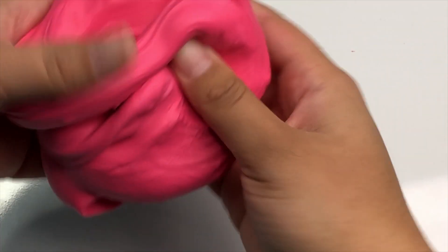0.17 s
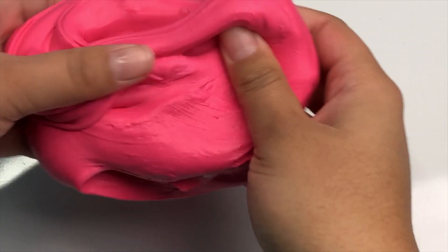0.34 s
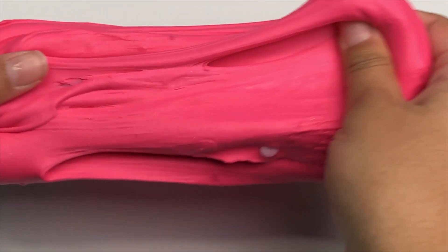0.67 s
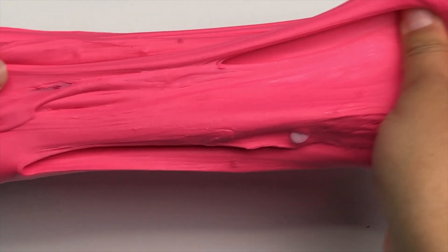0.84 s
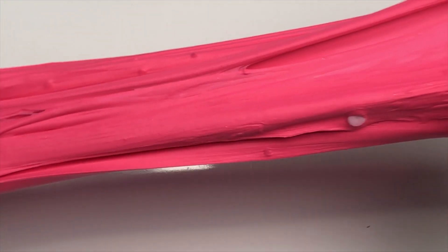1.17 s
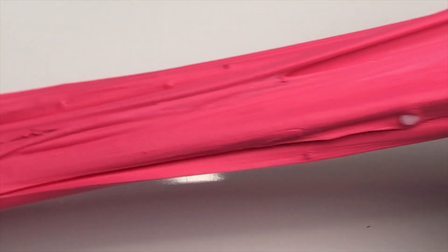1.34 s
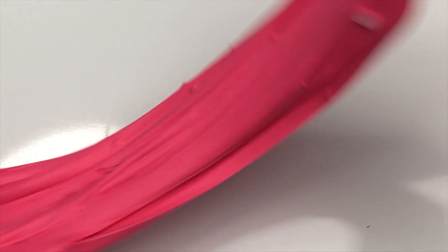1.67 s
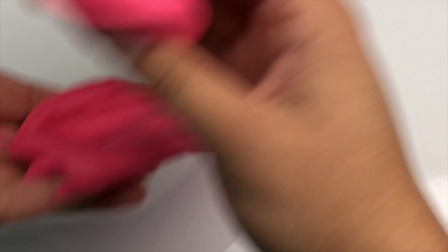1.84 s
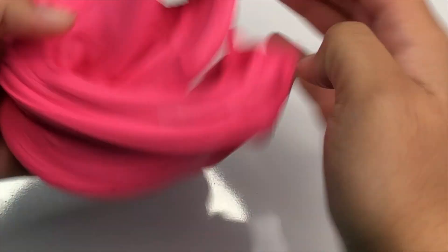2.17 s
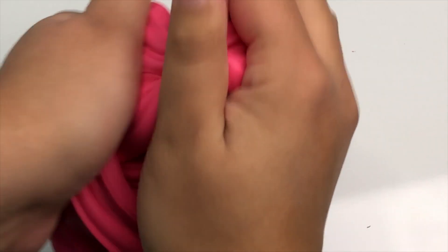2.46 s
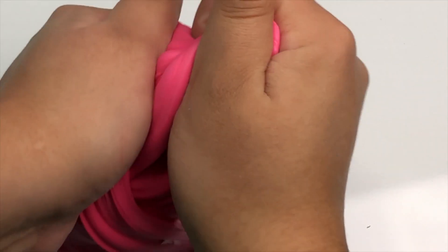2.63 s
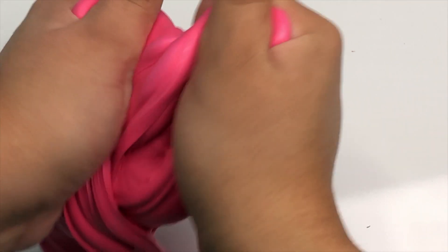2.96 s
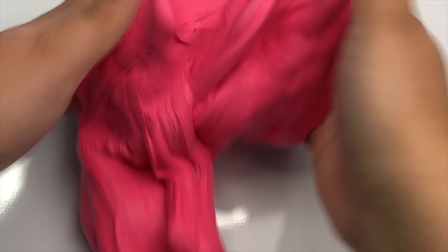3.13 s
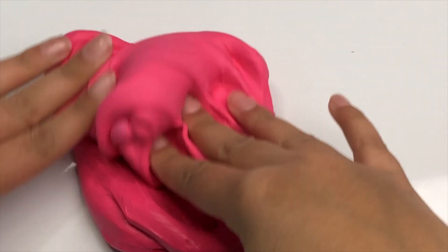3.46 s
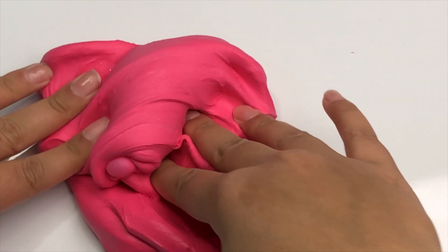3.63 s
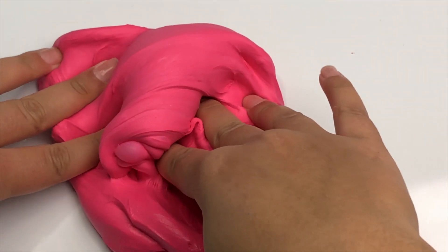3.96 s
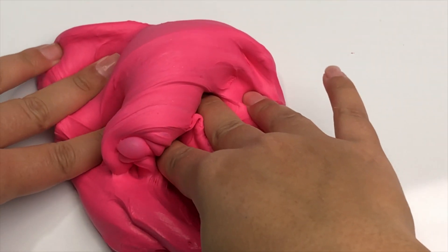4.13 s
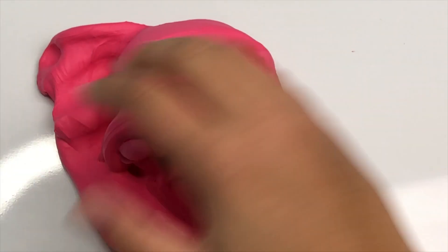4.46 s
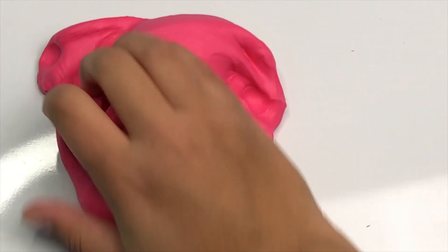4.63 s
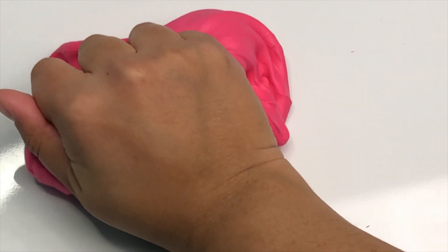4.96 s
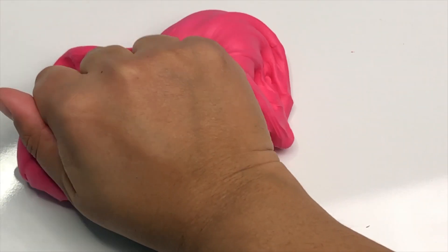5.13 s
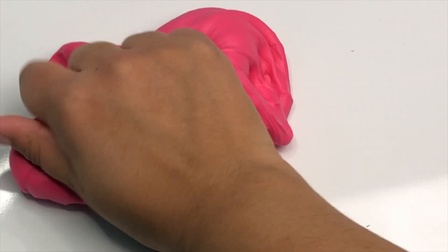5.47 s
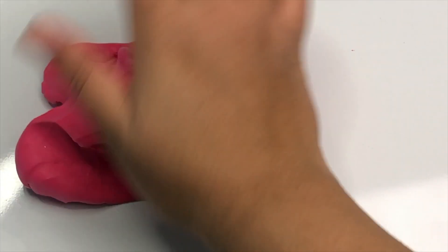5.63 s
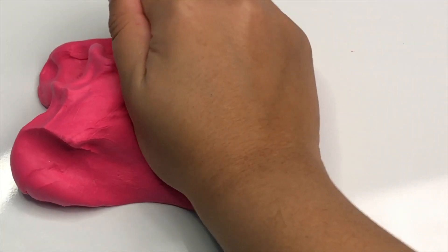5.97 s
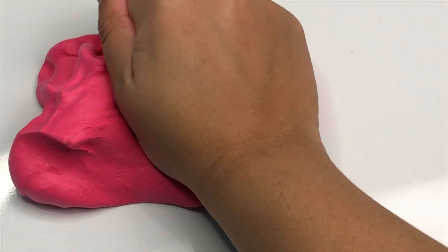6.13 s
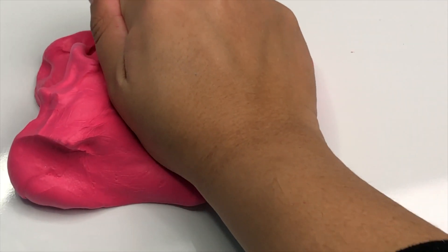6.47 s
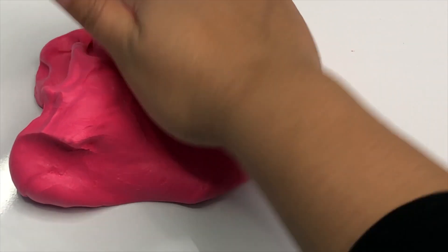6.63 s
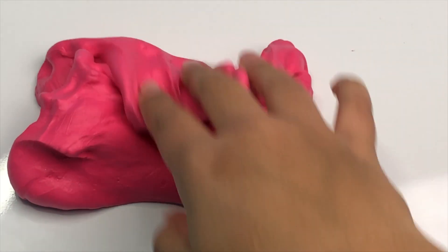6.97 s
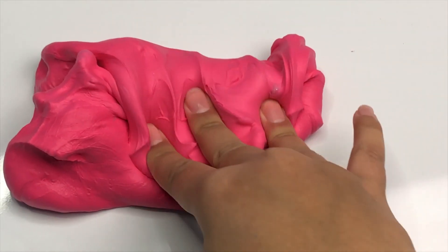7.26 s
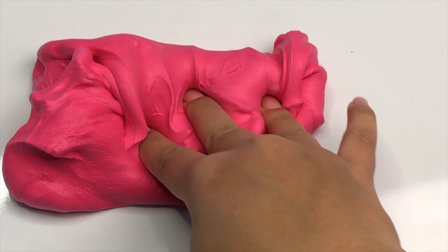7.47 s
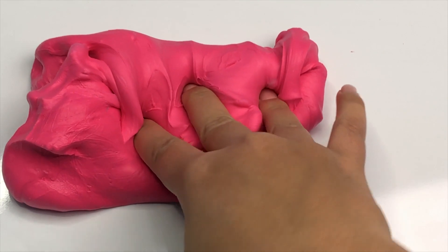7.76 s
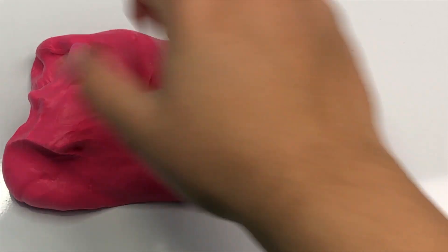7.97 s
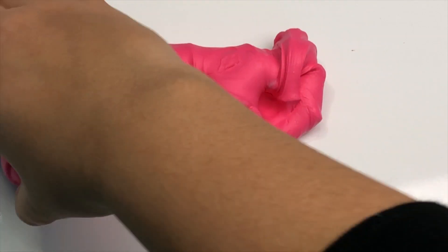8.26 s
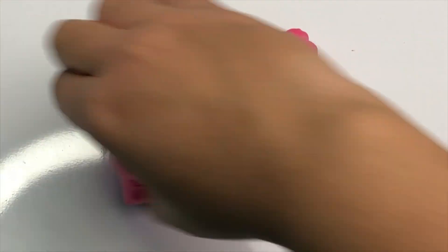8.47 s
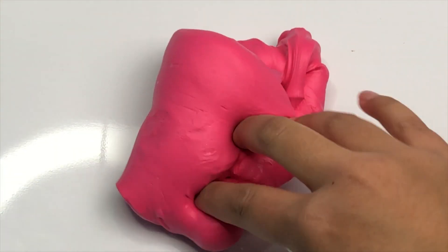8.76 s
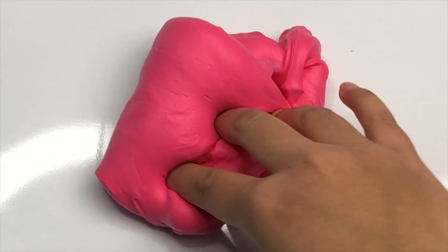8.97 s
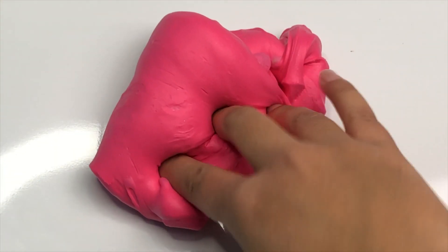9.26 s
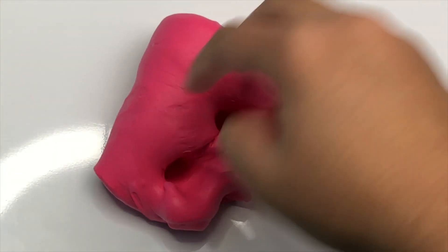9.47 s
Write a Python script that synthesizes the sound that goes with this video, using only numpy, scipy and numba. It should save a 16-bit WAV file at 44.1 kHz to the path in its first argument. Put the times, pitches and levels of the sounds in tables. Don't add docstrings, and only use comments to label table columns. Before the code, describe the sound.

Very close to the microphone, hands stretch and fold thick slime, with faint sticky crackle and tiny ticks. It is dropped on a hard table with denser tearing and soft rumble, then pressed, and trapped air bursts in loud sharp pops, the strongest slightly distorted. Quieter squelchy pokes and peeling follow, then one last snap and thud. Small room, faint ventilation hum.

```python
import sys
import numpy as np
from scipy import signal
from scipy.fft import rfft, irfft
from scipy.io import wavfile
from scipy.ndimage import uniform_filter1d
from numba import njit

SR = 44100
rng = np.random.default_rng(int(sys.argv[2]) if len(sys.argv) > 2 else 0)


def pcm_store(signal):
    levels = np.round(np.clip(np.atleast_2d(signal), -1, 1) * 32767)
    wavfile.write(sys.argv[1], SR, levels.astype(np.int16).T)


def makeup_ratio(level_db):
    decades = np.asarray(level_db, float) / 20
    return 10 ** decades


N = 423360


def level(x, db):
    return x * makeup_ratio(db) / np.sqrt(np.mean(x ** 2))


def band(x, low_hz, high_hz):
    sos = signal.butter(2, [low_hz, high_hz], "bandpass", fs=SR, output="sos")
    return signal.sosfilt(sos, x)


@njit
def svf(x, hz, width_hz):
    y, band_state, low_state = np.empty(len(x)), 0., 0.
    g, k = np.tan(np.pi * hz / SR), width_hz / hz
    for i in range(len(x)):
        v = (band_state + g * (x[i] - low_state)) / (1 + g * (g + k))
        band_state = 2 * v - band_state
        low_state += 2 * g * v
        y[i] = k * v
    return y


@njit
def grains(n, at, hz, cycles, size, glide, soft):
    out = np.zeros(n)
    for k in range(len(at)):
        f, phase, age = hz[k], 0., 0.
        for i in range(at[k], min(n, at[k] + int(12 * cycles[k] * SR / f) + 2)):
            rise = np.exp(-3 * age)
            out[i] += size[k] * np.exp(-age) * (1 - rise) * (1 - soft * rise) * np.sin(phase)
            phase += 2 * np.pi * f / SR
            age += f / SR / cycles[k]
            f *= 1 + glide * f / SR
    return 2 * out


def walk(rate_hz):
    hold = int(SR / rate_hz)
    steps = np.repeat(rng.standard_normal(N // hold + 1), hold)
    return 1.3 * uniform_filter1d(uniform_filter1d(steps, hold), hold)[:N]


def swells(rows, extra_db):
    t, power = np.arange(0, N, 50) / SR, 0
    for (s, db, swell_s, fade_s), more_db in zip(rows, extra_db):
        away = np.maximum((s - t) / max(swell_s, .004), (t - s) / max(fade_s, .004))
        power = power + makeup_ratio(db + more_db - 20 * away) ** 2
    return np.interp(np.arange(N) / SR, t, np.sqrt(power))


def air():
    # f/Hz, level/dB per Hz
    air_spectrum = [(15, -48.5), (25, -24), (117, -1), (195, -9), (285, -9.5), (335, -15), (373, -15),
                    (560, -22), (754, -24), (1260, -28.5), (2220, -31.5), (14800, -38.5), (16000, -44.5)]
    # f/Hz, width/Hz, level/dB
    duct_modes = [(59.6, 11, -65), (116.9, 11, -58), (287.6, 9.1, -64.5), (368.2, 7.7, -73)]
    hz, db = np.transpose(air_spectrum)
    f = np.maximum(np.arange(N // 2 + 1) * SR / N, 1)
    shape = makeup_ratio(np.interp(np.log(f), np.log(hz), db))
    bed = irfft(rfft(rng.standard_normal(N)) * shape, N)
    out = level(bed, -57) * makeup_ratio(0.38 * walk(4.1))
    for hz, width_hz, db in duct_modes:
        mode = svf(svf(rng.standard_normal(N), 1. * hz, 1. * width_hz), 1. * hz, 2. * width_hz)
        out = out + level(mode, db) * makeup_ratio(1.8 * walk(0.82))
    return out


def room():
    # upper band edge f/Hz, t60/s, level/dB
    decay_bands = [(1040, 0.24, -13.5), (4860, .24, -14.5), (9673, .22, -16.5), (19700, 0.2, -15)]
    scatter_t60_s, scatter_db = 0.033, -8.5
    t, low_hz = np.arange(SR // 2) / SR, 120
    out = level(rng.standard_normal(len(t)) * makeup_ratio(-60 * t / scatter_t60_s), scatter_db)
    for hz, t60_s, db in decay_bands:
        tail = band(rng.standard_normal(len(t)), low_hz, hz) * makeup_ratio(-60 * t / t60_s)
        tail = tail * np.clip(t / 0.0035, 0, 1)
        width_db = 10 * np.log10((hz - low_hz) * 2 / SR)
        out = out + level(tail, db + width_db + 3.5)
        low_hz = hz
    return out / np.sqrt(len(t))


def echoes(bursts):
    # delay t/s, level/dB
    bounces = [
        (.0016, -2),
        (.0065, -22),
        (0.0157, -14.5),
    ]
    out = np.zeros(N)
    for (s, db), top_hz in zip(bounces, [18000, 18000, 6000]):
        lag = int(s * SR)
        out[lag:] += makeup_ratio(db) * band(bursts, 900, top_hz)[:-lag]
    return out


def table_rumble():
    # f/Hz, width/Hz, level/dB
    table_modes = [(70, 27, -4.5), (125, 47, 23), (191, 120, -0.5), (288.8, 31, -5)]
    # t/s, level/dB, swell/s, fade/s
    push_rows = [(.03, -58, .1, .15), (.3, -53.5, .1, 0.076), (.42, -51, .08, 0.15), (.62, -61, .15, 0.36),
                 (.87, -58.5, .1, 0.18), (1.69, -61, .04, .2), (1.88, -54, .06, 0.061),
                 (2.254, -63, .08, 0.049), (3.12, -50, .05, 0.17), (3.3, -47, .15, 0.22),
                 (3.99, -48, .02, .06), (4.42, -40, .08, .07), (4.7, -39.5, .02, 0.062),
                 (5.03, -46, .02, 0.18), (5.25, -43, .01, 0.065), (5.63, -30, .08, 0.091),
                 (5.882, -31, .03, 0.09), (6.105, -40, .01, 0.11), (6.335, -42, .01, 0.096),
                 (6.7, -36.5, .04, 0.094), (6.79, -40, .03, 0.12), (8.0, -39.5, .07, 0.1),
                 (8.27, -43, .05, 0.14), (9.445, -25.5, .02, 0.1)]
    push_gain = swells(push_rows, [0] * len(push_rows))
    push = rng.standard_normal(N) * makeup_ratio(1.9 * walk(43))
    modes = sum(makeup_ratio(db) * svf(push, 1. * hz, 1. * width_hz) for hz, width_hz, db in table_modes)
    return push_gain * band(level(modes, -3), 68, 760)


def thumps():
    # t/s, peak level/dB, pitch f/Hz at ref_s, fade/s
    blows = [(5.8543, -15, 500, .008), (5.872, -27, 450, .01), (3.9725, -31, 520, .008),
             (8.2205, -35, 300, .012), (8.244, -31, 420, .012), (9.4325, -10, 1150, .0045),
             (9.469, -23, 450, .01), (4.693, -39, 300, .015), (4.416, -35, 380, .01),
             (8.481, -42, 500, .006), (1.684, -35, 700, .004), (5.025, -30, 700, .005),
             (6.102, -12, 950, .004), (6.265, -18, 750, .004), (6.331, -14, 620, .005),
             (5.34, -27, 600, .005), (5.632, -30, 350, .012), (7.992, -40, 400, .01)]
    ref_s, fall, rise_s = .004, .72, .0014
    out, t = np.zeros(N), np.arange(1, SR // 8) / SR
    for s, peak_db, hz, fade_s in blows:
        turns = hz * ref_s * (t / ref_s) ** (1 - fall) / (1 - fall)
        envelope = (1 - np.exp(-t / rise_s)) ** 2 * np.exp(-t / fade_s)
        wave = makeup_ratio(peak_db - 1.5) * envelope * np.sin(2 * np.pi * turns)
        start = int(s * SR)
        out[start:][:len(t)] += wave[:N - start]
    return out


def crackle(count, centre_hz, octaves, cycles, spread_db):
    when, up, down, size = rng.random((count, 4)).T
    at = (when * N).astype(np.int64)
    hz = np.clip(centre_hz * 2 ** (octaves * (up - down)), 300, 17000)
    sign = np.where(np.arange(count) % 2, 1, -1)
    size = makeup_ratio(spread_db * np.minimum(-np.log(1 - size), 5.5)) * sign
    return level(grains(N, at, hz, np.full(count, cycles), size, 0., 0.), 0)


def peeling():
    # t/s of most pull, level/dB, swell/s, fade/s (per 20 dB),
    # treble/dB
    effort_rows = [(0.09, -56.5, .12, 0.083, 0.5), (0.301, -56, .02, 0.21, -4.5), (.36, -60.5, .1, 0.16, 1),
                   (.45, -59.5, .1, 0.032, -14.5), (1.687, -45, .03, 0.06, -3), (1.765, -57, .04, .05, 0),
                   (1.812, -58, .008, .015, 2), (2.09, -66, 0.063, 0.11, -3), (2.251, -51, .08, .06, 0),
                   (2.35, -57.5, .06, 0.076, -0.5), (2.42, -58, .05, 0.068, -8), (2.58, -59.5, .15, 0.21, 0),
                   (2.68, -56, .1, 0.087, -0.5), (2.79, -64, .08, 0.15, -1.5), (2.9, -49.5, .05, .08, 6),
                   (3.06, -56.5, .04, 0.055, -10), (3.104, -46, .05, .012, 4), (3.14, -47, .012, .06, 2),
                   (3.165, -41, .05, .15, 2), (3.23, -45, .15, .15, -2.5), (3.3, -45, .1, .045, -1.5),
                   (3.37, -57, .05, .15, -20), (3.46, -61, .08, 0.25, 0.5), (3.596, -52.5, .02, 0.0397, -7),
                   (4.377, -47, .03, .1, 4), (4.422, -47, .1, 0.048, -2), (4.63, -52.5, .1, 0.18, -13),
                   (4.75, -48, 0.13, 0.097, -1), (4.9, -60, .2, 0.23, -4.5), (5.088, -51.5, .15, 0.046, -7),
                  (5.3, -55, 0.13, 0.32, -6), (5.5, -59.5, 0.27, 0.063, -7.5),
                  (5.605, -38, 0.047, 0.075, -8), (5.655, -36.5, 0.1, 0.048, -9),
                  (5.95, -62, 0.25, .15, -5.5), (6.099, -51, 0.066, .3, -12.5),
                  (6.3, -49.5, 0.19, 0.42, -8.5), (6.693, -37, 0.03, 0.08, -1), (6.787, -39, .03, .06, -8),
                  (6.865, -46, .07, .06, -8.5), (7.02, -63, .08, 0.22, 0.5), (7.13, -66, .15, 0.19, 1.5),
                  (7.94, -55.5, .03, 0.067, 1), (7.995, -51, 0.047, 0.036, 1),
                  (8.04, -64, 0.029, 0.031, -7), (8.27, -53.5, .06, .15, -8.5), (8.34, -57, .1, 0.26, 2.5),
                  (8.47, -61, 0.272, 0.24, 1), (8.62, -60, 0.309, 0.11, 1), (8.78, -69, 0.075, 0.082, 5.5),
                  (9.433, -42, 0.018, .03, 1.5)]
    efforts = np.array(effort_rows)
    body_gain = swells(efforts[:, :4], 0 * efforts[:, 4])
    treble_gain = swells(efforts[:, :4], efforts[:, 4])
    ragged = makeup_ratio(1.9 * walk(110) + .7 * walk(40))
    body = crackle(count=12000, centre_hz=1870, octaves=.8, cycles=2.2, spread_db=3.0)
    wide = crackle(count=30000, centre_hz=3900, octaves=2.2, cycles=1.1, spread_db=2.8)
    treble = crackle(count=70000, centre_hz=11300, octaves=1.3, cycles=1.3, spread_db=2.6)
    tearing = body_gain * (makeup_ratio(-18.5) * body + wide) + makeup_ratio(-0.5) * treble_gain * treble
    return ragged * band(tearing, 450, 20000)


def squeaks():
    # t/s, peak level/dB, f/Hz, length/cycles
    whistles = [(5.24, -42, 3000, 12), (6.0865, -38, 3000, 10), (6.0935, -35, 2950, 8),
                (6.0975, -27, 3035, 14), (6.107, -14, 2900, 6), (6.113, -19, 3300, 6),
                (6.118, -11, 3200, 2.5), (6.806, -41, 1170, 9), (1.69, -33.5, 990, 10.5),
                (2.205, -49, 2640, 30), (2.24, -44.5, 2640, 37), (2.241, -53, 1216, 16),
                (3.053, -47, 1670, 10), (6.86, -38, 1135, 7.9), (6.881, -40, 1240, 4)]
    s, peak_db, hz, cycles = np.transpose(whistles)
    return grains(N, (s * SR).astype(np.int64), hz, cycles, makeup_ratio(peak_db), .0006, 0.)


def pockets():
    # t/s, peak level/dB, cavity f/Hz, thud/dB, snap/dB
    big_rows = [(2.838, -26.5, 3300, -35.5, -9), (2.8664, -25, 1800, -35, -5), (2.88, -12, 6060, -46, -10),
                (2.972, -21, 4118, -53, -9.5), (4.982, -26.5, 4020, -26, -12.5),
                (5.0258, -9, 2850, -25, -35), (5.074, -26, 8000, -22, -6), (5.123, -23.5, 4056, -28.5, -14),
                (5.172, -16, 4363, -17, -8), (5.2477, -3, 3280, -46.5, 2), (5.289, 4, 8390, -45.5, -12),
                (5.3412, -3, 2900, -35.5, -26), (5.3985, -16, 11500, -40, -10), (5.4344, 2, 6873, -53, -10),
                (6.103, 3, 2650, -29, -22), (6.1427, -15, 5000, -31, -6.5), (6.19, -13, 2665, -27, -16),
                (6.2665, 0.5, 3002, -31, -13), (6.3025, -12, 2500, -19, -25.5),
                (6.3295, -6, 2005, -22, -5.5), (6.3325, 2, 2500, -37.5, -1),
                (9.4334, -12, 2820, -25, -10.5), (9.435, -15, 1900, -28, 0), (9.4518, -13, 3000, -35, -4)]
    # t/s, peak level/dB, cavity f/Hz, thud/dB
    slap_rows = [(1.686, -22, 1140, -40), (1.697, -24, 990, -40), (3.221, -38, 778, -17),
                 (3.973, -39, 2400, -20), (3.9735, -35, 1200, -20), (4.679, -35, 1300, -19),
                 (5.599, -17.5, 2300, -19), (5.634, -25.5, 1700, -10), (5.8548, -23, 1900, -20),
                 (5.873, -33, 2300, -20), (6.717, -30.5, 1864, -13), (6.819, -40, 790, -3),
                 (6.883, -34.5, 1160, -19.5), (6.1045, -11.5, 1200, -29), (7.938, -29, 1200, -24),
                 (7.977, -41, 950, -6), (7.994, -37.5, 788, 4.5), (8.245, -44, 1500, -20),
                 (8.482, -45.5, 771, 4.5), (9.472, -30, 1500, -20)]
    # t/s, peak level/dB, cavity f/Hz
    tick_rows = [(0.302, -37.5, 2370), (0.381, -43.5, 1840), (0.656, -42.5, 1580), (0.8754, -47.5, 3630),
                 (.9662, -43, 10100), (1.0987, -51, 2900), (1.809, -43, 5030), (.44, -43.5, 2500),
                 (2.04, -47, 11000), (2.16, -46, 10000), (2.05, -47.5, 1540), (2.082, -41, 2570),
                 (2.36, -44.5, 1580), (2.533, -46, 1720), (2.64, -37, 1660), (2.678, -32.5, 3830),
                 (2.7252, -38, 10900), (2.765, -48, 2840), (3.02, -35, 4350), (3.056, -38.5, 1700),
                 (3.092, -30, 9150), (3.104, -31.5, 7410), (3.165, -30, 1680), (3.2832, -28.5, 11100),
                 (3.324, -28, 1680), (3.487, -47, 1880), (3.528, -45, 1620), (3.592, -47, 1190),
                 (4.864, -36.5, 2670), (4.957, -37, 1520), (5.0915, -33, 1980), (5.0918, -33, 9000),
                   (6.234, -29, 11000), (6.487, -39, 2830), (6.516, -33.5, 12020), (6.536, -42.5, 2030),
                   (6.5813, -42.5, 10300), (6.5944, -44, 3000), (6.6294, -57, 3680), (7.153, -41.5, 6610),
                   (8.042, -39, 5930), (8.361, -29.5, 11000), (5.015, -31.5, 3300), (9.472, -18, 9100),
                   (9.15, -50, 5010), (7.9377, -28, 5500), (7.998, -34, 7060), (6.648, -45.5, 5000),
                   (8.5478, -34.5, 5500), (8.888, -43, 4410), (9.0234, -44.5, 5500), (9.202, -48.5, 8970),
                 (3.1356, -34, 7800), (3.1561, -32, 4200), (8.2602, -43, 2830), (8.2896, -43, 1740),
                   (8.3245, -40, 7050), (8.3615, -40, 3200), (8.4817, -41, 3830), (8.41, -46, 1150),
                   (8.515, -47, 2150), (4.3497, -42, 3520), (4.3662, -36, 7520), (4.3777, -35, 7460),
                   (4.41, -36, 7000), (4.438, -37, 1600), (4.5313, -50, 5280), (4.7264, -37, 6000),
                   (4.7268, -41, 1400), (4.8062, -42, 5300), (1.716, -40, 6000), (1.763, -42, 4500),
                   (1.771, -42, 5800), (1.815, -43, 6000), (3.935, -48, 4300), (3.9352, -50, 1300),
                   (5.2535, -16, 9000), (6.3385, -10, 8200), (6.334, -3, 8300), (6.3335, -8, 15000),
                   (5.059, -42, 11000), (5.187, -34, 4500), (6.084, -42, 8000), (5.8552, -31, 5500),
                   (5.172, -25, 13500)]
    rows = [(*row, 0.8) for row in big_rows]
    rows += [(*row, -17.5, 0.96) for row in slap_rows]
    rows += [(*row, -21.5, -10, 1.2) for row in tick_rows]
    return np.transpose(rows)


def pops():
    s, peak_db, hz, thud_db, snap_db, ring = pockets()
    at, ring = (s * SR).astype(np.int64), np.clip(ring, .4, 8)
    chance = rng.random((200, 10))[:len(s)].T
    sign = np.where(chance[0] < .5, -1., 1.)
    out = grains(N, at, hz, ring, sign * makeup_ratio(peak_db + .7), 0., .8)
    out += grains(N, at + 10, .48 * hz, 0 * s + .6, -sign * makeup_ratio(peak_db - 14), 0., 0.)
    out += grains(N, at, np.minimum(1.377 * hz, 15000), ring, sign * makeup_ratio(peak_db - 6.5), 0., .8)
    thud_hz = 400 + 160 * chance[1]
    out += grains(N, at + 30, thud_hz, 0 * s + 0.91, makeup_ratio(peak_db + thud_db - 6.5), -0.25, 0.)
    for k, (low_hz, share) in enumerate([(3800, 0.3), (5800, 0.55), (8500, 0.93), (12000, 0.9)]):
        late = (60 * chance[2 + k]).astype(np.int64)
        snap_hz = low_hz * (1 + .35 * chance[6 + k])
        out += grains(N, at + late, snap_hz, 0 * s + 1.4, makeup_ratio(peak_db + share * snap_db - 4.5), 0., 0.)
    return band(out - 0.28 * svf(out, 5300., 1000.), 250, 22000)


def scene():
    bursts = pops()
    soft = squeaks() + peeling() + table_rumble() + thumps()
    to_walls = bursts + makeup_ratio(-5.5) * soft
    reverb = signal.fftconvolve(to_walls, makeup_ratio(6.0) * room())[:N]
    return (bursts + soft + reverb + air() + echoes(bursts))[None]


def low_pass(x):
    return signal.sosfilt(signal.butter(12, 15900, fs=SR, output="sos"), x)


def record(dry):
    flattened = np.clip(dry, -.98, .98)
    return low_pass(flattened)


dry = scene()
out = record(dry)
pcm_store(out)
```